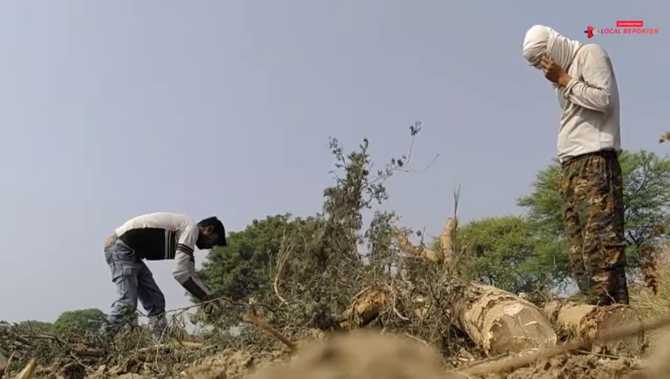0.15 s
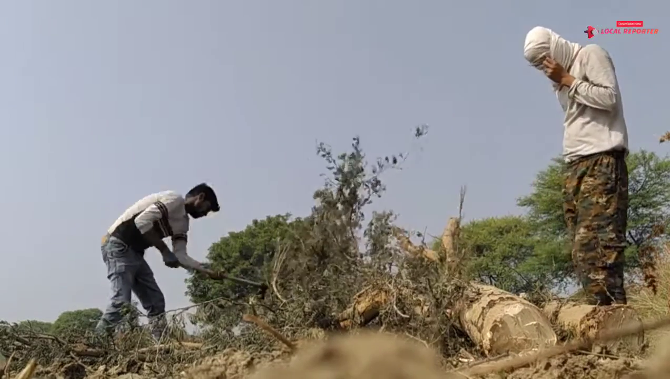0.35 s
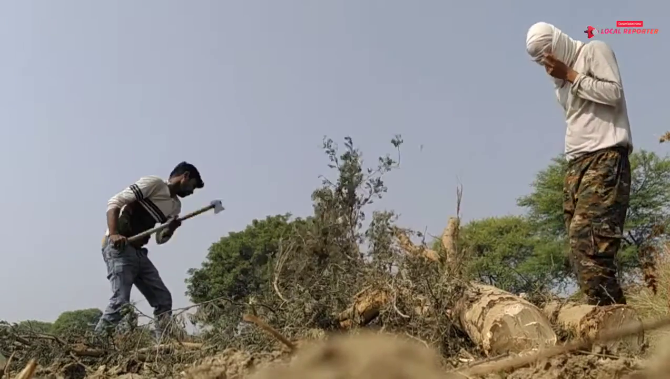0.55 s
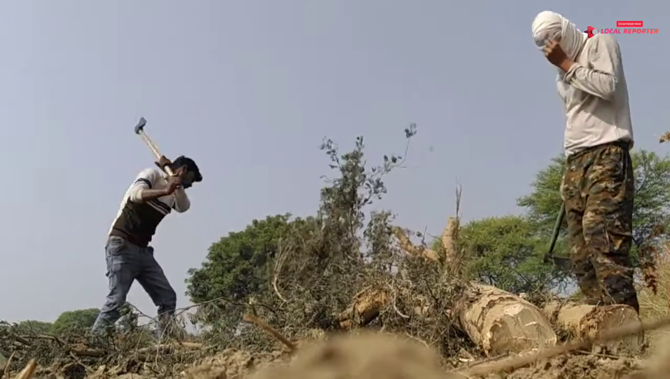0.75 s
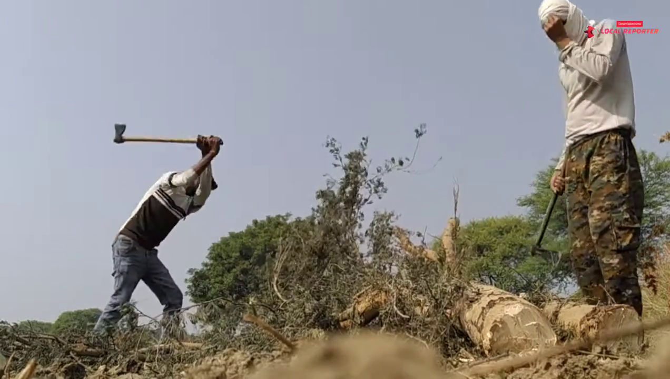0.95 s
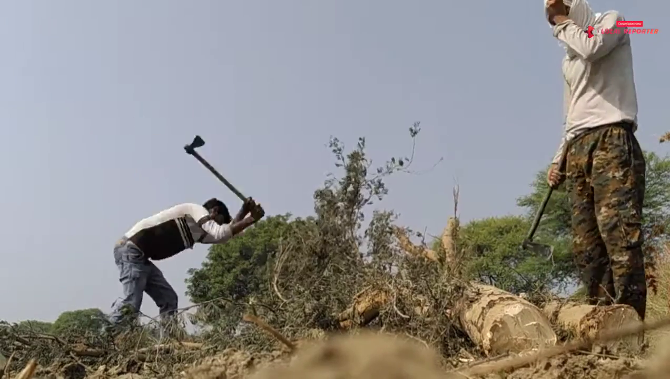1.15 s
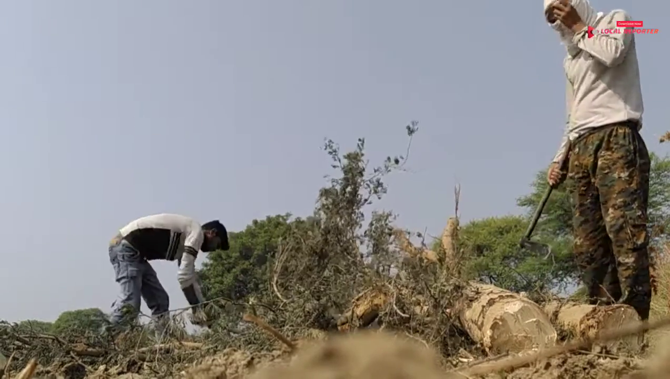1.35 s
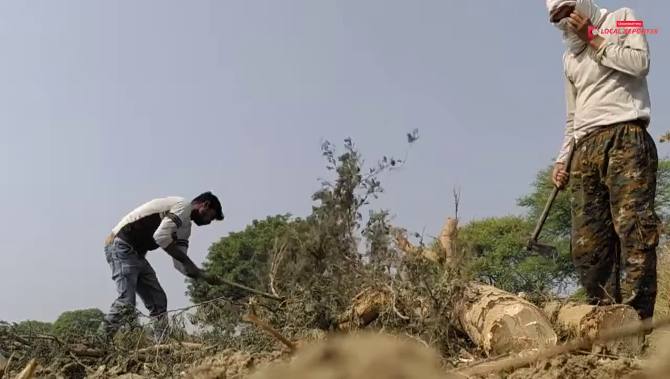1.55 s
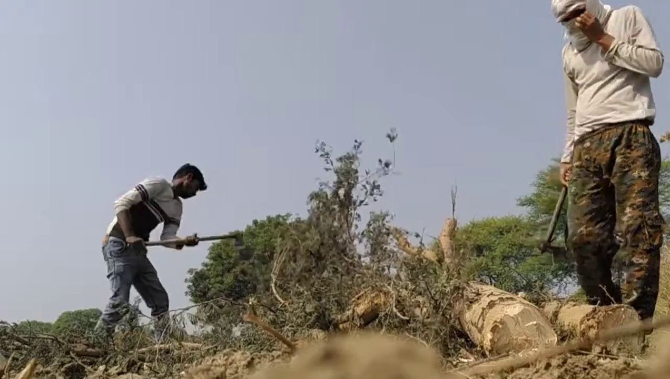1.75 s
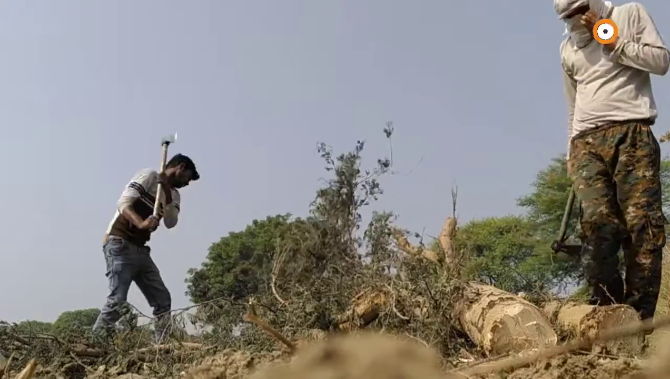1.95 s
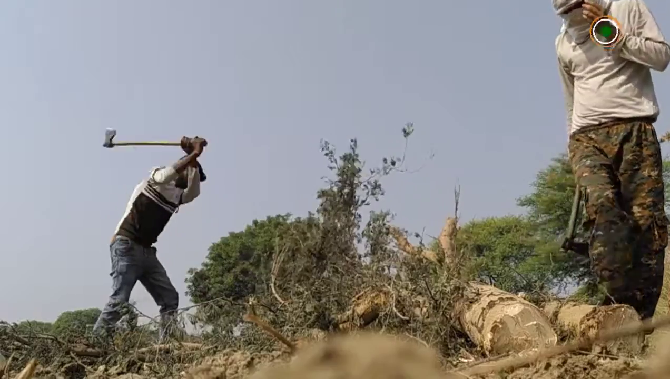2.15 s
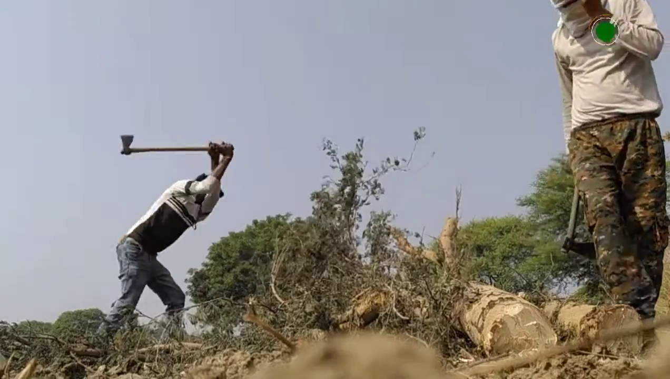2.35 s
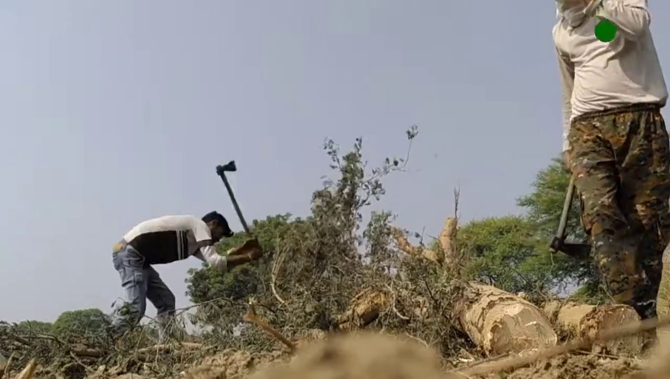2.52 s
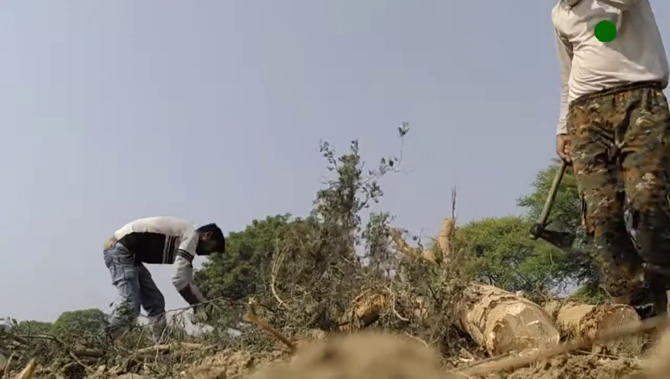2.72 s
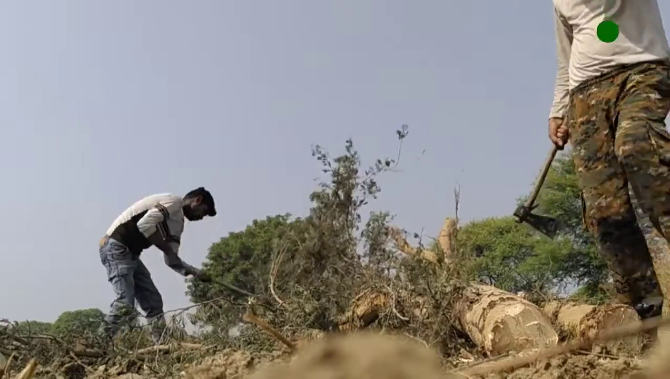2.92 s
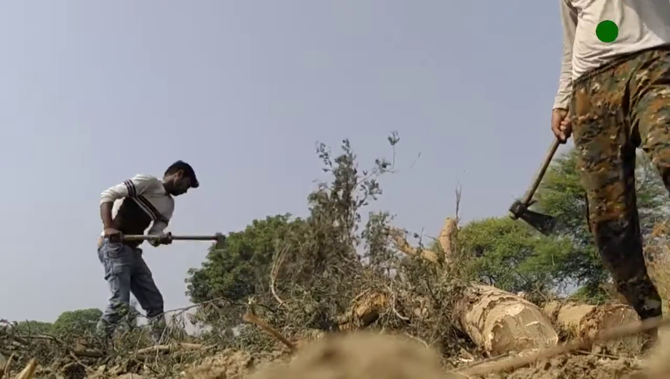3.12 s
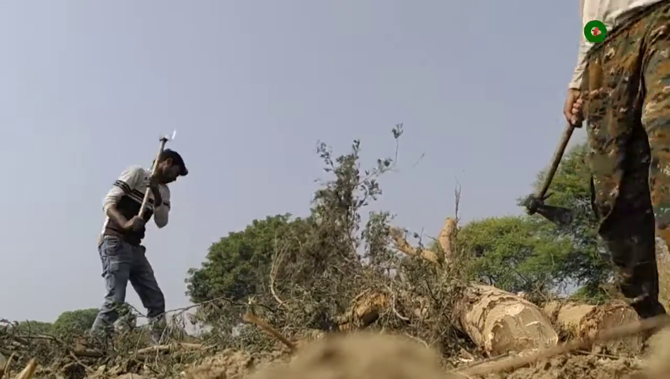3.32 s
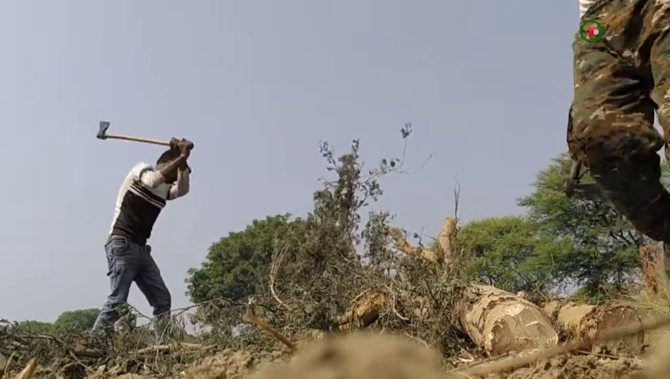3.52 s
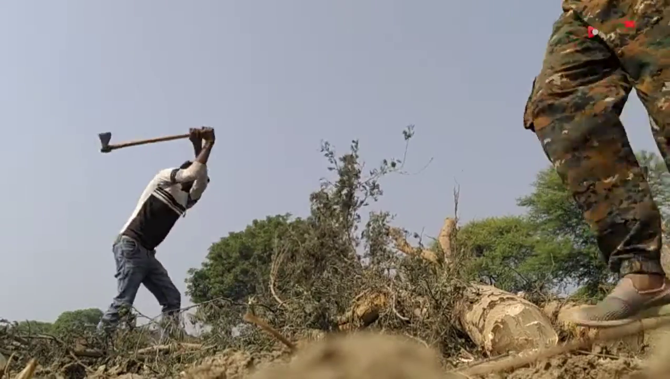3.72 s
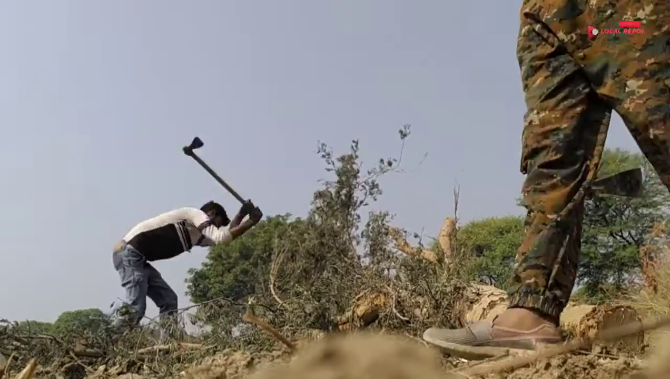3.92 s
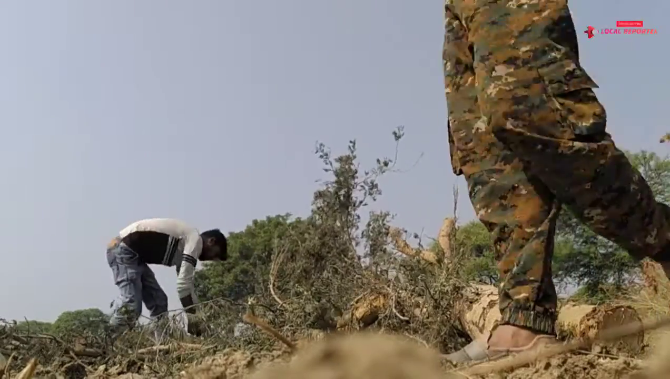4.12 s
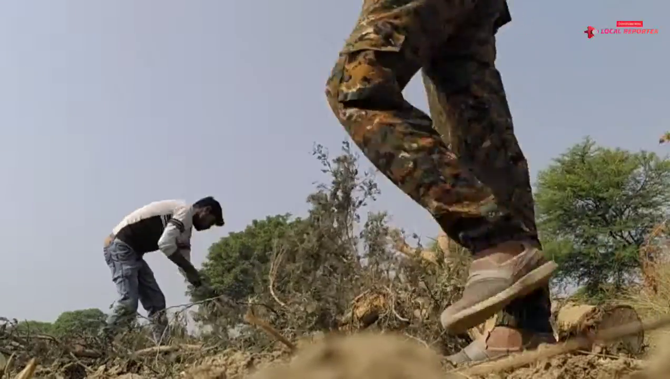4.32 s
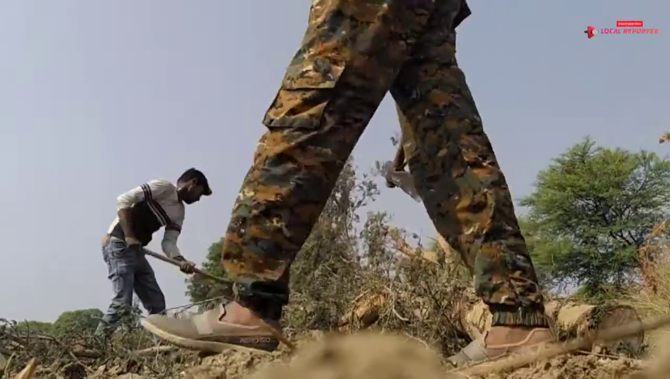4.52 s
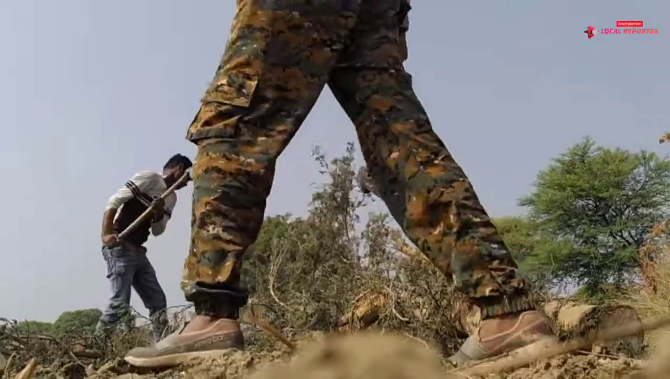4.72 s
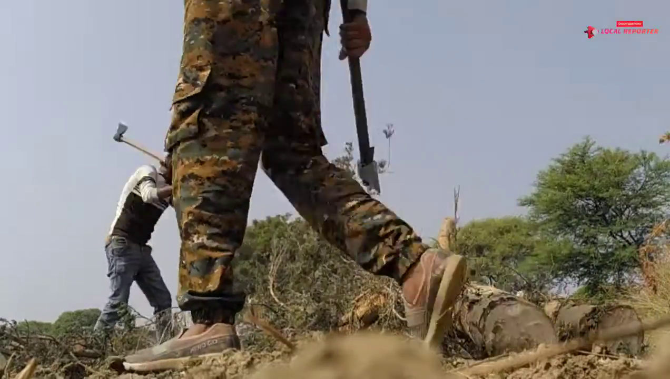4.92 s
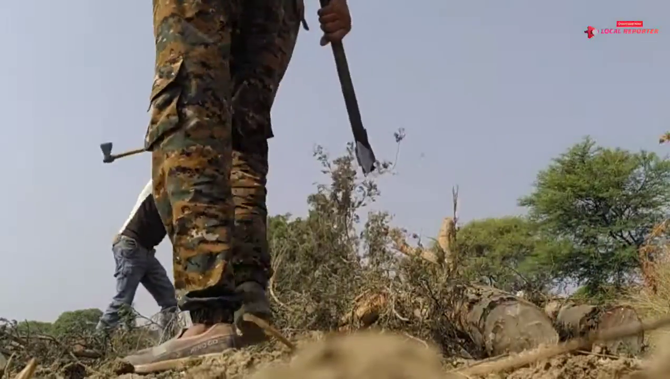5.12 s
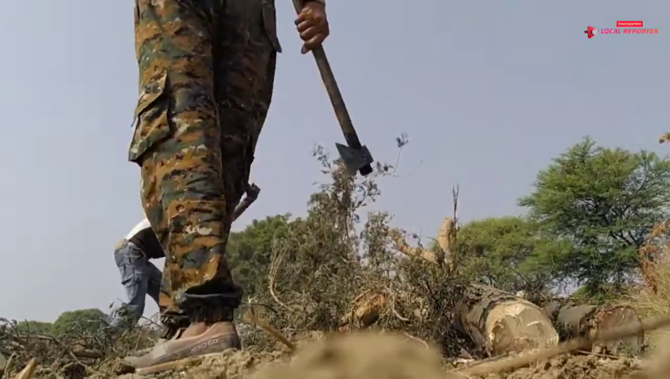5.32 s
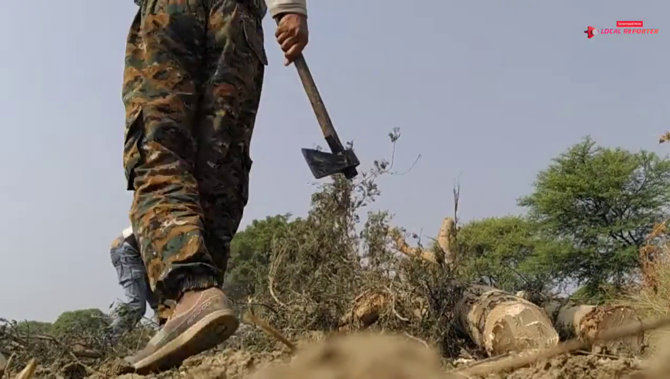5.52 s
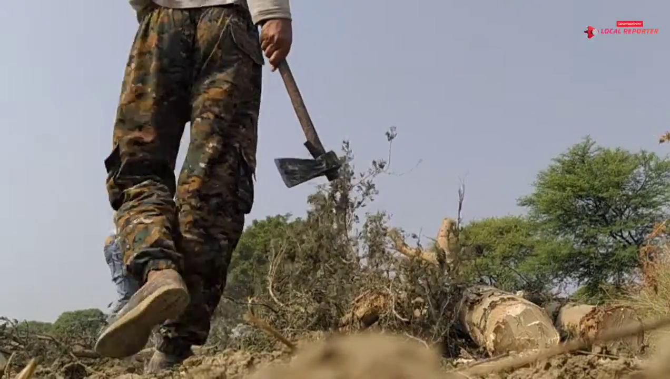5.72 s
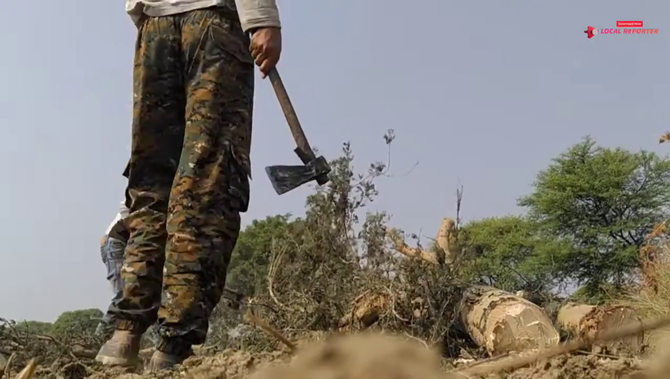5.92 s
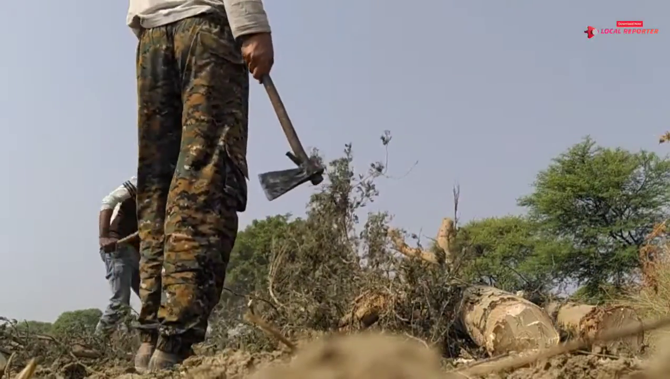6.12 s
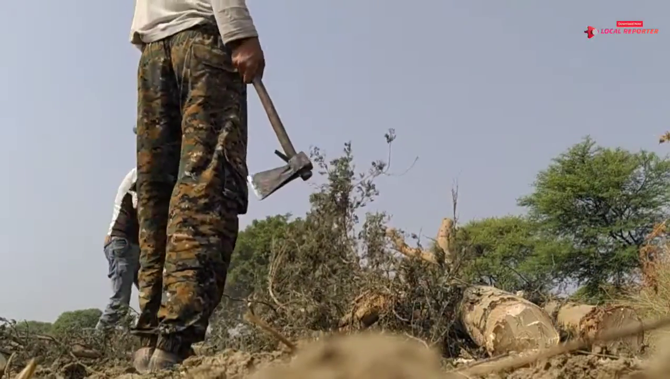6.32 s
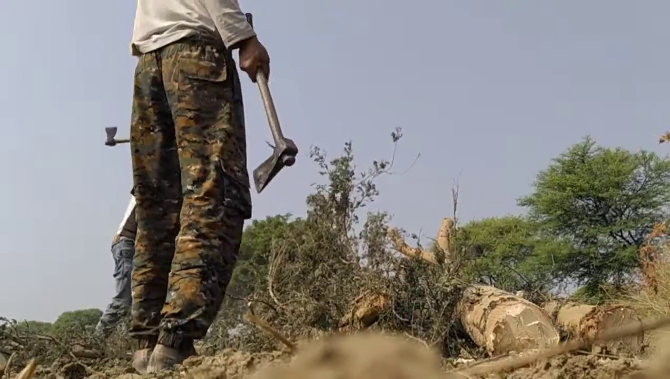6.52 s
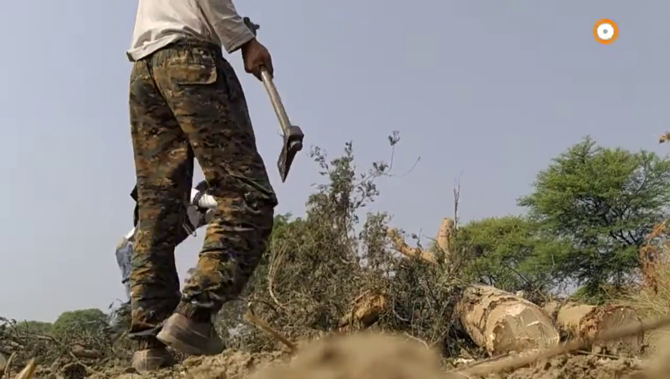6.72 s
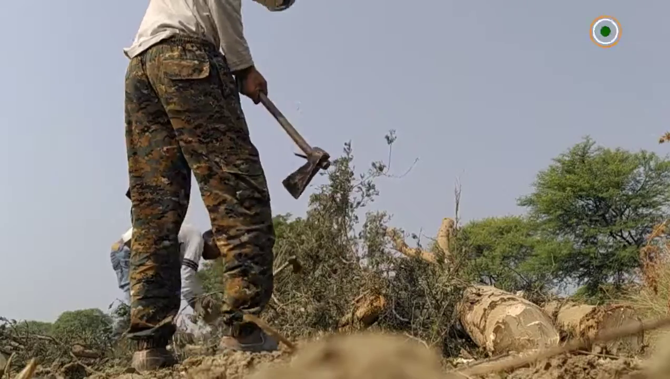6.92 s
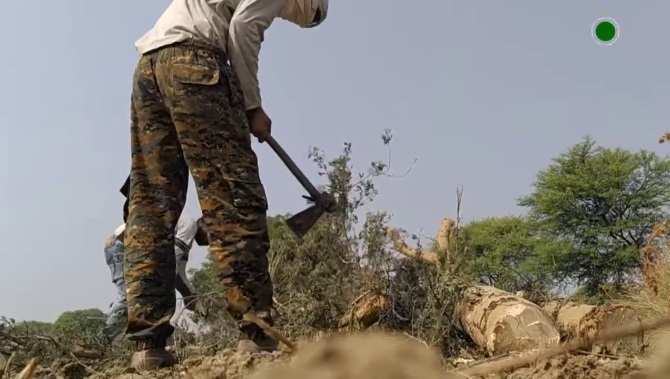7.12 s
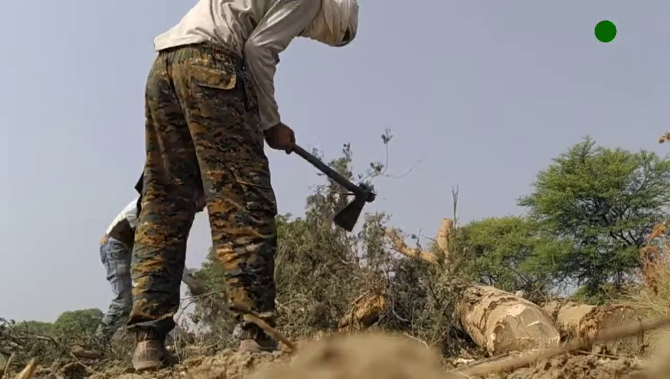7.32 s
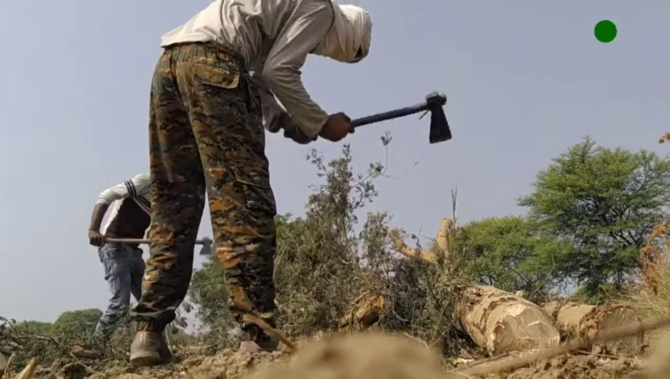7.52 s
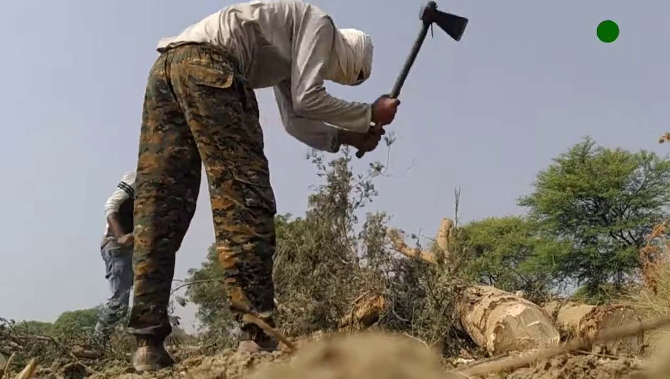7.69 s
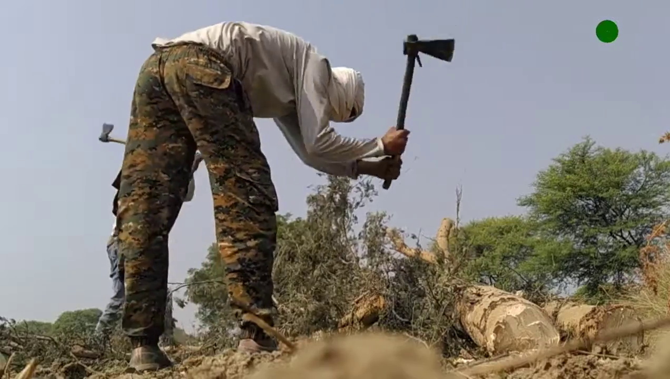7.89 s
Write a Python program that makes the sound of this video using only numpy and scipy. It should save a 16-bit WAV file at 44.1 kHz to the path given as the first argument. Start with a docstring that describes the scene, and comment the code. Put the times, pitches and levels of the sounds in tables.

```python
"""Axe on a felled trunk

An axe chops six times into a trunk among dry branches: jerks of the blade, damped log and steel modes,
bursts of splitting noise, then a fading hiss from the brush. Blunter blows part the fibres more slowly.
A walker knocks, scuffs and crunches over dry soil in shaped noise; cloth rustles after every blow.
A far bird's chirp and a thin squeak are sliding tones; the open field is steady rumbling, hissing noise.
"""
import sys
import numpy as np
from scipy import signal
from scipy.fft import rfft, irfft
from scipy.io import wavfile
from scipy.ndimage import uniform_filter1d

SR = 44100
rng = np.random.default_rng(int(sys.argv[2]) if len(sys.argv) > 2 else 0)


def generate_wav(sig):
    """Save sig (samples, or channels by samples) to the path in sys.argv[1] as 16-bit PCM at SR."""
    pcm = np.round(np.clip(np.atleast_2d(sig).T, -1, 1) * 32767).astype(np.int16)
    wavfile.write(sys.argv[1], SR, pcm)


N = 350595
LEAD = 0.03  # s of lead-in before an event's time zero
T = np.arange(SR) / SR - LEAD  # s around an event

# one blow a row; layer levels are relative to the force:
# hit_s (hardest jerk), force_db, dullness (0 clean to 1 blunt), bite_db, jerk_gap_s,
# knock_hz, knock_db, favoured_ring_hz, crack_hz, crack_db, split_db
BLOWS = [(0.2043, 0.3, .12, -4, .00258, 996, -10.2, 494, 3200, -16.5, -23.5),
         (1.5094, -1, 0.46, -2, .0025, 747, -7.5, 492, 1248, -21, -28),
         (2.831, 0.2, 0.44, -3, 0.002516, 1035, -22, 370, 1713, -13.5, -20),
         (4.2726, 1.94, .5, -7.5, .00226, 1112, -4, 378, 1802, -22, -26.5),
         (5.7161, -2, 0.61, -16, .0028, 1043, -10, 416.7, 3125, -20, -20),
         (7.1585, -2.5, 0.97, -8.5, .00434, 1124, -6, 236, 1637, -10.5, -24.5)]
RING_DB, THUD_DB, BRUSH_DB = -13.5, -21.5, -39  # layers of a clean blow, against its force
CLEAN_RISE_S, BLUNT_RISE_S = 0.00055, 0.004  # the blunter the blow, the slower the fibres part
BLUNT_THUD_DB, BLUNT_RING_DB = 9, 20  # extra thud and favoured ring of a fully blunt blow
ECHO_S, ECHO_DB, ECHO_BLUNT_DB = 0.0388, -28, -8.5  # slap off the log pile, weaker when blunt


def chops(bass_hz=72):
    """Each blow bites, knocks and rings, then splits fibres, shakes the brush and slaps back off the log pile."""
    out = np.zeros((2, N))
    for (hit_s, force_db, dull, bite_db, gap_s, knock_hz, knock_db,
         ring_hz, crack_hz, crack_db, split_db) in BLOWS:
        rise = CLEAN_RISE_S * (BLUNT_RISE_S / CLEAN_RISE_S) ** dull
        force = amp(force_db)

        wood = amp(bite_db) * bite(gap_s) + amp(knock_db) * knock(knock_hz)
        wood += amp(RING_DB) * log_ring(ring_hz, BLUNT_RING_DB * dull)
        scattered = amp(THUD_DB + BLUNT_THUD_DB * dull) * thud(rise)
        add(out, hit_s, force * (wood + scattered))

        tearing = amp(crack_db) * crack(crack_hz) + amp(split_db) * split(rise, dull)
        fibres = speckle(tearing) + amp(BRUSH_DB) * brush(rise)
        add(out, hit_s + 0.0009, force * fibres)  # the fibres part once the blade is in

        echo_db = ECHO_DB + ECHO_BLUNT_DB * dull
        add(out, hit_s + ECHO_S, force * amp(echo_db) * slap())
    # the chopping carries little deep bass
    highpass = signal.butter(2, bass_hz, "high", fs=SR, output="sos")
    return signal.sosfilt(highpass, out)


# the push of the blade on the wood: freq_hz, level_db
BITE_COLOUR = [(40, -47), (120, -29), (220, -2), (400, 1.5), (600, -2), (850, -8.5), (1300, -19),
               (2300, -30), (3200, -32.5), (6000, -48), (15000, -67.5)]
# the jerks of one blow: place (in jerk gaps), strength (signed gain)
BLADE_JERKS = [(-3, 0.03), (-1, 0.59), (0, 0.94), (0.7, -0.12)]


def bite(gap_s):
    """The blade enters in quick jerks, each a push and a rebound; their spacing gives the hollow pitch."""
    hz = np.fft.rfftfreq(SR, 1 / SR)
    jerks = sum(strength * np.exp(-2j * np.pi * hz * (LEAD + place * gap_s))
                for place, strength in BLADE_JERKS)
    push = irfft(1j * jerks * amp(read(BITE_COLOUR, hz)), SR)
    return push / abs(push).max()


def knock(hz, rise=0.0016, t60=0.0097):
    """Struck wood or soil gives a few heavily damped cycles."""
    return -np.sin(2 * np.pi * hz * T) * burst(rise, t60)


# modes of the log and its limbs, before a blow favours some: freq_hz, level_db, t60_s
LOG_MODES = [(89, -13.5, 0.16), (118.5, -10, 0.22), (214.6, -14, .12), (248.6, -12.5, 0.11),
             (325, -2.5, 0.105), (395.4, -6.5, 0.115), (475, 3.5, 0.011), (496, 4.5, 0.044),
             (666, -21, 0.13), (785, -12, .09), (950, -16.5, 0.089), (1060, -17.5, 0.065),
             (1192, -20, .115), (1280, -24, 0.14)]


def log_ring(favoured_hz, boost_db, octaves=0.11):
    """Each blow lands on a new spot of the trunk and favours other modes."""
    modes = []
    for hz, db, t60 in LOG_MODES:
        distance = np.log2(hz / favoured_hz) / octaves
        modes.append((hz, db + boost_db * np.exp(-distance ** 2), t60))
    return ring(modes, rise=0.0032)


# the knock thrown about by logs and ground: freq_hz, density_db (dB per Hz)
THUD_COLOUR = [(30, -36.5), (65, -20), (110, -16.5), (155, -13), (260, -2), (470, -7.5), (570, -10),
               (700, -9), (1100, -7.5), (1600, -19.5), (2400, -28.5), (6000, -50)]
# its decay: freq_hz, t60_s
THUD_DECAY = [(60, 0.25), (130, 0.21), (300, 0.12), (550, 0.11), (1100, .068), (4000, 0.15)]
# its early reflections: freq_hz, left_right_likeness (-1 to 1)
THUD_LIKENESS = [(100, .93), (400, 0.55), (1200, .7), (4000, .3)]


def thud(rise):
    """Logs and ground scatter the knock into noise whose bands die at different speeds."""
    return fade(noise(THUD_COLOUR, THUD_LIKENESS), THUD_DECAY) * swell_in(rise + 0.0015)


def crack(hz, t60=0.019):
    """The first fibres let go in one short, bright snap."""
    colour = [(hz / 3, -28), (hz * 0.68, -11), (hz, 0), (hz * 1.12, -5), (hz * 1.25, -20), (hz * 5, -36)]
    return noise(colour, NEAR_LIKENESS) * burst(0.00035, t60)


# splitting fibres: freq_hz, density_db (dB per Hz)
SPLIT_COLOUR = [(300, -23.5), (1200, -2), (1900, -2), (2350, -2.5), (3100, 2), (4500, 0.5), (7000, 1),
                (12000, -0.5), (16000, -1)]
# brief ring of the steel head, damped by the cut: freq_hz, level_db, t60_s
STEEL_MODES = [(2745, -18, 0.11), (3024, -15.5, 0.088), (3650, -14, 0.074), (4070, -14.5, 0.033),
               (4650, -19, 0.15), (5392, -17.5, 0.13), (6294, -20.5, .08), (7962, -19, .1),
               (9540, -17.5, 0.054)]
TICK_HZ, TICK_DB = 4240, 6  # cutting edge of a clean blow, against the splitting


def split(rise, dull):
    """Fibres tear in tiny snaps while the steel head rings; the cleaner the blow, the more its edge ticks."""
    tearing = noise(SPLIT_COLOUR, NEAR_LIKENESS) * grains(depth_db=3, size=30) * burst(rise, 0.12)
    tick = amp(TICK_DB) * (1 - dull) * crack(TICK_HZ, t60=0.0074)
    return tearing + ring(STEEL_MODES, rise=0.002) + tick


def speckle(x, depth_db=1.5, size=220):
    """Random ripples over frequency give each burst small peaks and dips of colour."""
    ripple = drift((2, SR // 2 + 1), size)
    return irfft(rfft(x) * amp(depth_db * ripple), SR) * (T < 0.5)


# the lingering wash from the brush: freq_hz, density_db (dB per Hz)
BRUSH_COLOUR = [(60, -4), (130, 7), (270, 12), (600, 8), (1500, -1), (3000, -5), (5500, -3), (8000, 3),
                (11500, 7), (16000, 3)]
# its decay: freq_hz, t60_s
BRUSH_DECAY = [(100, .3), (500, 0.28), (2000, 0.8), (5000, 0.91), (11000, 0.85)]


def brush(rise, twigs_db=2):
    """Shaken dry branches hiss unevenly, and each band fades at its own speed."""
    wash = fade(noise(BRUSH_COLOUR, FAR_LIKENESS), BRUSH_DECAY)
    return wash * grains(depth_db=twigs_db, size=300) * swell_in(3 * rise)


def slap(rise=0.00072, t60=0.012):
    """The sharp edge of a blow, thrown back as one short tick."""
    colour = [(200, -6), (800, 5.5), (2000, -1.5), (5000, -2), (10000, -0.5), (16000, -12)]
    return noise(colour, FAR_LIKENESS) * burst(rise, t60)


# the chopping at the two microphone ports: freq_hz, phase_rad (positive: left leads)
PORT_LEAD = [(120, 0), (400, 0.24), (800, -0.5), (1500, 0.1), (4000, 1)]
# its balance: freq_hz, left_over_right_db
PORT_LEVEL = [(380, 0), (700, 1.5), (1300, -1.5), (2400, 1), (4400, -2), (9000, -3), (15000, 6)]


def ports(x):
    """Sound from the trunk meets the two ports with slightly different phase and strength."""
    hz = np.fft.rfftfreq(N, 1 / SR)
    half = np.exp(0.5j * read(PORT_LEAD, hz)) * amp(read(PORT_LEVEL, hz) / 2)
    return irfft(rfft(x) * np.array([half, 1 / half]), N)


# a shoe knocks on clods and sticks: hit_s, level_db, hollow_hz
SHOE_KNOCKS = [(2.693, -50, 400), (3.393, -48, 765), (4.122, -39, 1040), (4.170, -39, 613),
               (4.505, -50.5, 495), (4.646, -36, 486), (4.679, -40, 620), (4.771, -38, 1060),
               (5.555, -40, 890), (5.827, -41.5, 500), (6.334, -53.5, 1080), (7.543, -54, 940),
               (7.903, -44, 1140)]
STEP_RISE_S, STEP_T60_S, STEP_GRIT_DB = 0.00077, 0.047, -14
STEP_CYCLES, STEP_SCUFF_DB = 11.4, -2  # cycles to the knock's t60; the scuff around it
# a sole drags over the soil: middle_s, level_db, length_s, hollow_hz, grit_db (against the scuff)
SOLE_DRAGS = [(2.509, -62, .14, 450, -9), (3.375, -55.5, .1, 700, -8), (3.815, -56, 0.065, 341, -4.5),
              (4.123, -45.5, 0.047, 1000, -9), (4.704, -46.5, 0.088, 600, -4), (4.869, -57, .14, 650, -5),
              (5.52, -56, 0.062, 645, -15), (7.834, -57, 0.093, 500, -9)]
# soil grains sliding: freq_hz, density_db (dB per Hz)
SCRAPE_COLOUR = [(600, -26), (1400, -5), (2200, 0), (3800, 0.5), (6000, -8.5), (12000, -9)]
SCRAPE_DB = -2  # against the grit
# dry leaves and twigs give way underfoot: hit_s, level_db, t60_s
LITTER = [(0.848, -43.5, 0.1), (3.852, -45, 0.093), (4.679, -47, 0.024), (5.212, -51, .03),
          (7.543, -51.5, .02), (7.868, -53, .05)]
# rise as a share of the t60; the soft thump beneath the grit
CRUNCH_RISE, CRUNCH_BODY_DB, CRUNCH_BODY_HZ = 0.053, -7, 336


def steps():
    """The walker's shoes knock briefly, drag slowly or crush dry litter."""
    out = np.zeros((2, N))
    for hit_s, db, hz in SHOE_KNOCKS:
        scuff = contact(hz, STEP_GRIT_DB, sharpness=4, scuff_db=1.5) * burst(STEP_RISE_S, STEP_T60_S)
        hollow = knock(hz, rise=STEP_RISE_S, t60=STEP_CYCLES / hz)
        add(out, hit_s, amp(db) * (hollow + amp(STEP_SCUFF_DB) * scuff))
    for middle_s, db, length, hz, grit_db in SOLE_DRAGS:
        scrape = noise(SCRAPE_COLOUR, NEAR_LIKENESS) * grains(depth_db=5.5, size=90)
        drag = contact(hz, grit_db, sharpness=1.9, scuff_db=12) + amp(grit_db + SCRAPE_DB) * scrape
        add(out, middle_s - length / 2, amp(db) * drag * arch(length))
    for hit_s, db, t60 in LITTER:
        crunch = contact(CRUNCH_BODY_HZ, -CRUNCH_BODY_DB) * burst(CRUNCH_RISE * t60, t60)
        add(out, hit_s, amp(db + CRUNCH_BODY_DB) * crunch)
    return out


# grit under a sole: freq_hz, density_db (dB per Hz)
GRIT_COLOUR = [(100, -2.5), (300, -3), (1500, -12), (3000, -7), (6000, -.5), (10000, 8), (16000, -5)]


def contact(body_hz, crunch_db, sharpness=4, scuff_db=2):
    """A sole on the ground: a dull scuff and a small hollow resonance, with crunching grit on top."""
    colour = [(60, -2.5), (200, 4), (1400, -6), (4000, -25.5), (12000, -32.5)]
    scuff = noise(colour, NEAR_LIKENESS) * grains(depth_db=3.5, size=130)
    hollow = signal.lfilter(*signal.iirpeak(body_hz, sharpness, fs=SR), scuff)
    body = hollow / hollow.std() + amp(scuff_db) * scuff
    grit = noise(GRIT_COLOUR, FAR_LIKENESS) * grains(depth_db=4, size=70)
    return body / body.std() + amp(crunch_db) * grit


# rubbing cloth: freq_hz, density_db (dB per Hz)
CLOTH_COLOUR = [(1000, -13), (4000, -2.5), (7000, 4.5), (9500, 6), (12000, -0.5), (16000, 1)]
LIFT_S, LIFT_LENGTH_S, LIFT_DB = 0.785, 0.21, -61.5  # backswing after each blow; level against its force
WALK_S, WALK_SPREAD_S, WALK_DB = 3.7, 0.65, -65  # the walker's trousers rub most around this moment


def rustles():
    """Cloth brushes softly on every backswing, and on and off as the walker sets out."""
    passing = np.exp(-((np.arange(N) / SR - WALK_S) / WALK_SPREAD_S) ** 2)
    out = amp(WALK_DB) * passing * noise(CLOTH_COLOUR, FAR_LIKENESS, size=N)
    out *= np.resize(grains(depth_db=3, size=2500), N)
    for hit_s, force_db, *_ in BLOWS:
        cloth = noise(CLOTH_COLOUR, FAR_LIKENESS) * grains(depth_db=3, size=150) * arch(LIFT_LENGTH_S)
        add(out, hit_s + LIFT_S - LIFT_LENGTH_S / 2, amp(LIFT_DB + force_db) * cloth)
    return out


# a far bird's two-part chirp and a thin squeak: start_s, length_s, start_hz, end_hz, level_db
CALLS = [(6.366, .03, 4020, 3720, -66), (6.402, 0.021, 3850, 3470, -68), (7.84, .075, 1330, 1264, -60)]


def whistles(waver=0.036, size=100):
    """Short wavering tones slide downwards."""
    out = np.zeros((2, N))
    for start_s, length, start_hz, end_hz, db in CALLS:
        progress = np.clip(T / length, 0, 1)
        hz = start_hz + (end_hz - start_hz) * progress + waver * start_hz * drift(SR, size)
        tone = np.sin(2 * np.pi * np.cumsum(hz) / SR)
        add(out, start_s, amp(db) * arch(length) * tone)
    return out


# still air over the field: freq_hz, density_db (dB per Hz)
AIR_COLOUR = [(20, -23.5), (40, -6.5), (60, -9.5), (84, -1.5), (115, -16.5), (200, -16), (310, -17),
              (475, -22), (840, -25.5), (1500, -29.5), (5500, -33), (12000, -31.5), (12600, -52),
              (16000, -60)]
# its width: freq_hz, left_right_likeness (-1 to 1)
AIR_LIKENESS = [(60, 0.98), (130, 0.36), (290, 0.48), (640, 0.013), (1410, -0.17), (3100, -0.35),
                (6820, -0.2), (15000, 0.14)]
AIR_DB = -55.5


def field():
    """A steady distant rumble lies under a thin hiss."""
    return amp(AIR_DB) * noise(AIR_COLOUR, AIR_LIKENESS, size=N)


def amp(db):
    """Decibels to gain."""
    return 10 ** (np.asarray(db) / 20)


def read(points, hz):
    """A table joined by straight lines on a log-frequency axis."""
    f, value = np.transpose(points)
    return np.interp(np.log(hz + 1), np.log(f + 1), value)


def add(mix, s, sound):
    """Mixes in an event whose time zero falls at s seconds."""
    part = mix[:, round((s - LEAD) * SR):][:, :sound.shape[-1]]
    part += sound[..., :part.shape[1]]


# direct sound: freq_hz, left_right_likeness (-1 to 1)
NEAR_LIKENESS = [(100, 0.99), (1000, 0.96), (2500, 0.0016), (5000, .15), (9000, 0.00032)]
# scattered sound: freq_hz, left_right_likeness (-1 to 1)
FAR_LIKENESS = [(100, .7), (600, 0.6), (3000, 1), (8000, 0.07)]


def noise(spectrum, likeness, size=SR):
    """Stereo noise of rms 1 with a given colour and left-right likeness."""
    hz = np.fft.rfftfreq(size, 1 / SR)
    a, b = rfft(rng.standard_normal((2, size)))
    same = np.clip(read(likeness, hz), -1, 1)
    pair = np.array([a, same * a + np.sqrt(1 - same ** 2) * b])
    x = irfft(pair * amp(read(spectrum, hz)), size)
    return x / x.std()


def drift(shape, size):
    """Random values smoothed over size neighbours, with their spread kept near 1."""
    return uniform_filter1d(rng.standard_normal(shape), size) * np.sqrt(size)


def grains(depth_db, size):
    """A jagged gain of rms 1: sound that comes in tiny separate snaps."""
    g = amp(depth_db * np.clip(drift(SR, size), -2, 2))
    return g / np.sqrt(np.mean(g ** 2))


def swell_in(rise):
    """An exponential swell up to time zero, then full level."""
    return np.exp(np.minimum(T, 0) / rise)


def burst(rise, t60):
    """An envelope that swells up to time zero and then dies away."""
    return swell_in(rise) * amp(-60 * np.maximum(T, 0) / t60)


def arch(length):
    """A half-sine rise and fall that starts at time zero."""
    return np.sin(np.pi * np.clip(T / length, 0, 1))


def fade(x, t60s):
    """Lets each band die at its own speed after time zero."""
    hz, t, z = signal.stft(x, SR, nperseg=256)
    z = z * amp(-60 * np.maximum(t - LEAD, 0) / read(t60s, hz)[:, None])
    return signal.istft(z, SR, nperseg=256)[1][:, :SR]


def ring(modes, rise):
    """Damped modes build up just after time zero; neighbours swing in opposite directions."""
    t = np.maximum(T, 0)
    swing = sum((-1) ** k * amp(db - 60 * t / t60) * np.sin(2 * np.pi * hz * t)
                for k, (hz, db, t60) in enumerate(modes))
    return swing * (1 - np.exp(-t / rise))


def scene():
    """The chopping, the walker, the far calls and the open air."""
    return ports(chops()) + steps() + rustles() + whistles() + field()


TREBLE_HZ, EDGE_HZ = 12100, 15700  # shelf and final cut


def record(dry, top_db=-19, ceiling=0.99):
    """Peaks above the ceiling overload the input; the top treble is shelved down, then cut."""
    hz = np.fft.rfftfreq(N, 1 / SR)
    shelf = amp(top_db * np.clip((hz - TREBLE_HZ) / 150 + 0.5, 0, 1))
    x = irfft(rfft(np.clip(dry, -ceiling, ceiling)) * shelf, N)
    lowpass = signal.firwin(511, EDGE_HZ, window=("kaiser", 9), fs=SR)
    return signal.oaconvolve(x, lowpass[None], "same", axes=1)


dry = scene()
out = record(dry)
generate_wav(out)
```